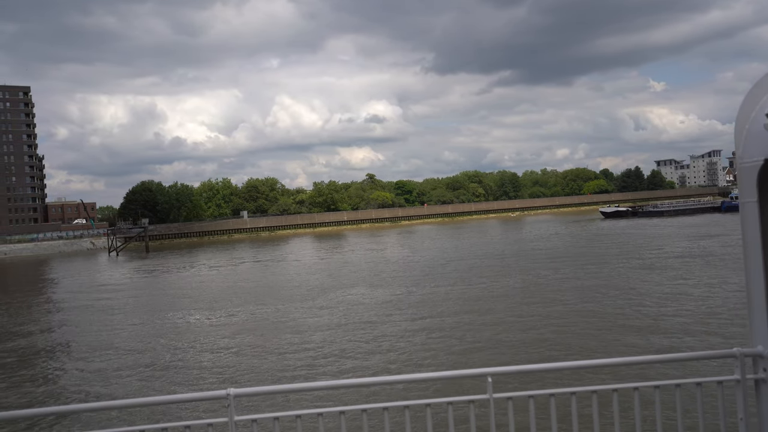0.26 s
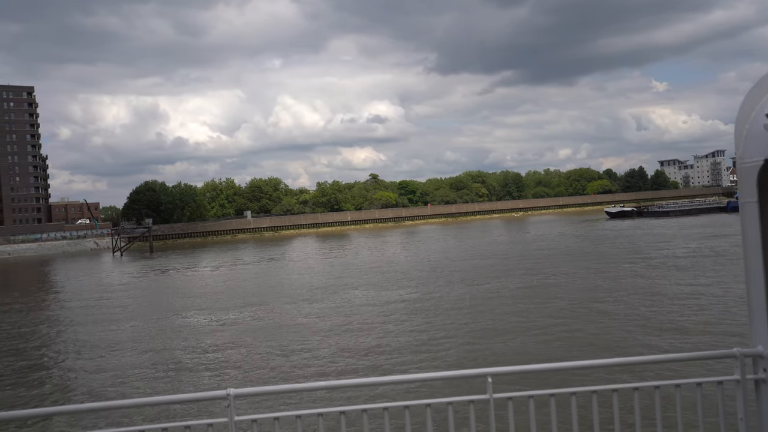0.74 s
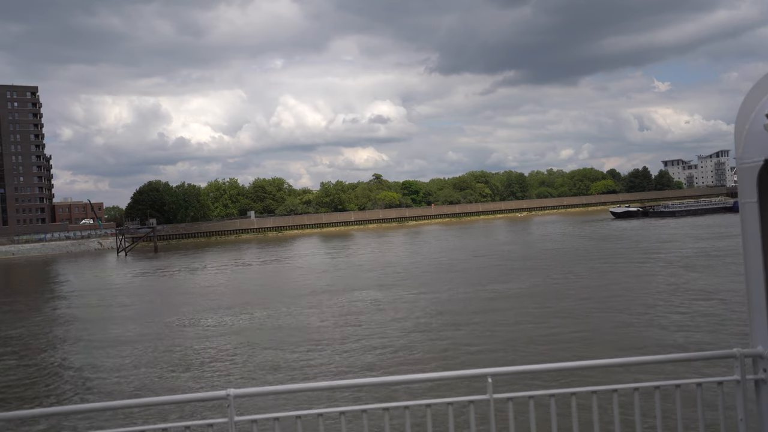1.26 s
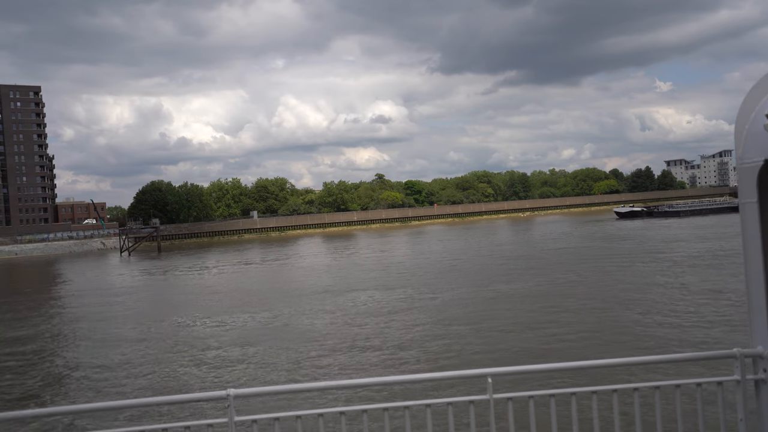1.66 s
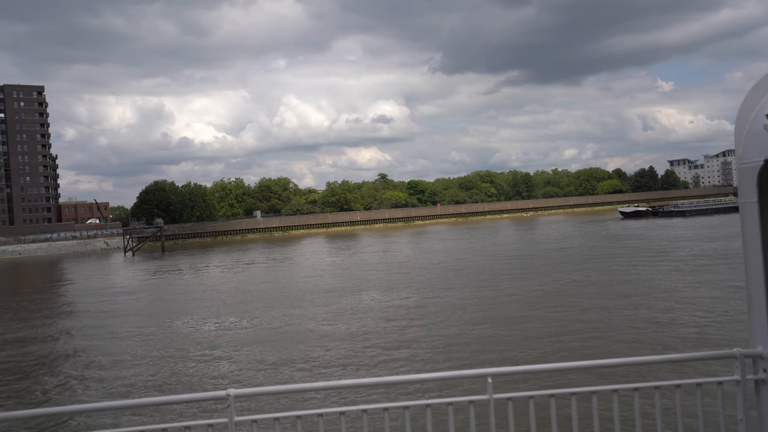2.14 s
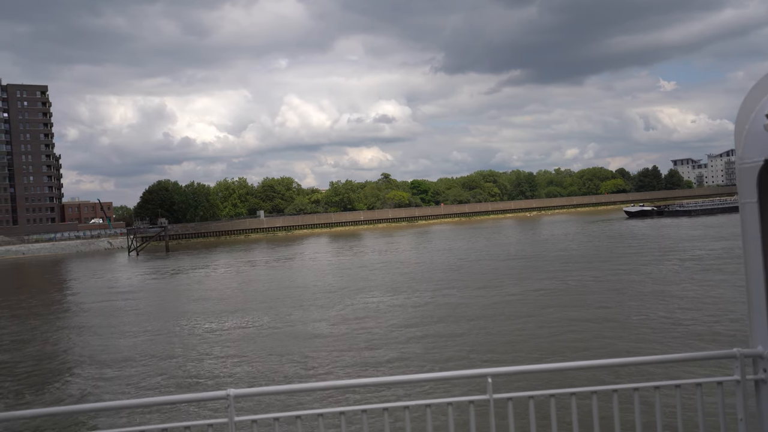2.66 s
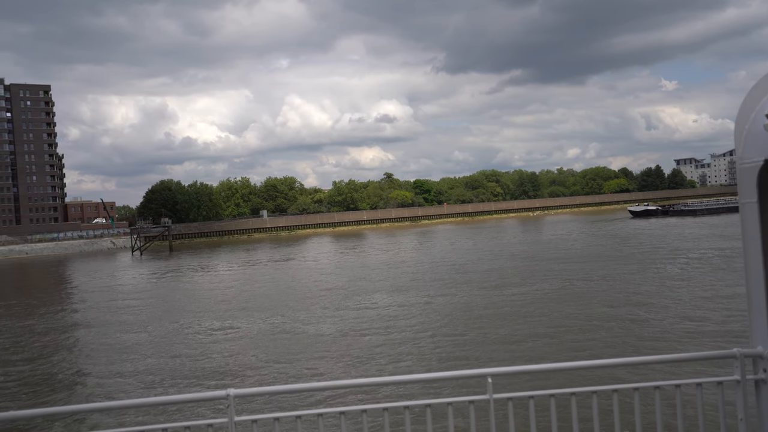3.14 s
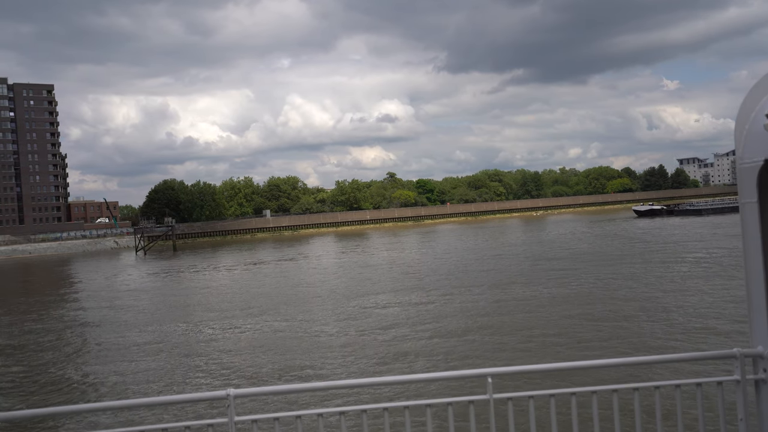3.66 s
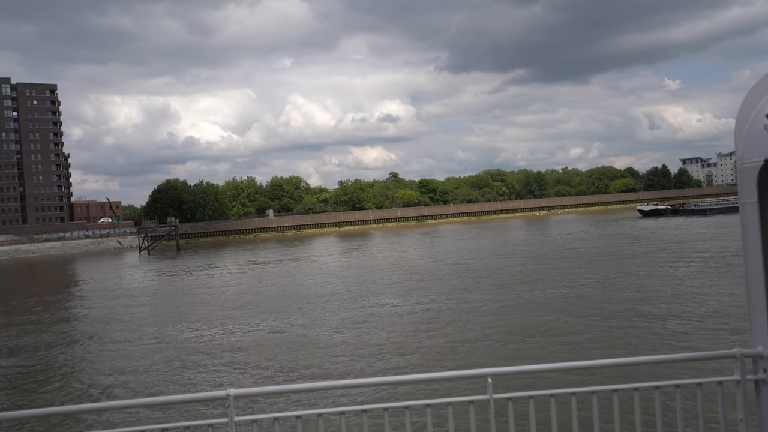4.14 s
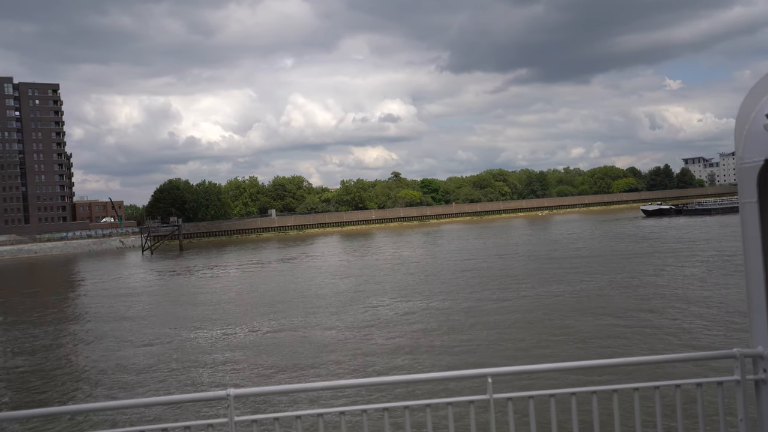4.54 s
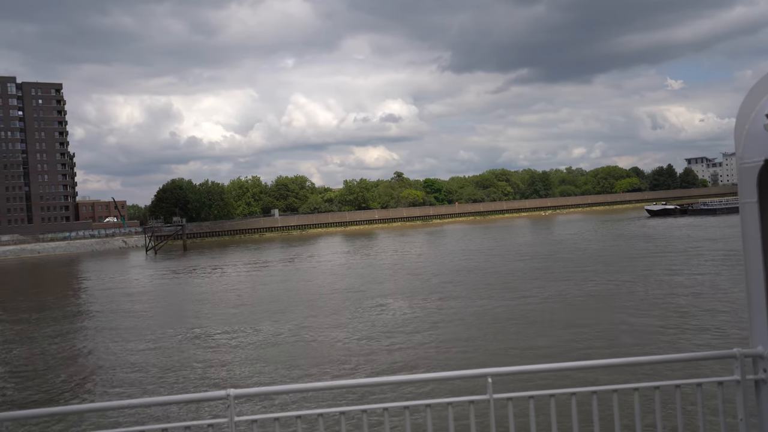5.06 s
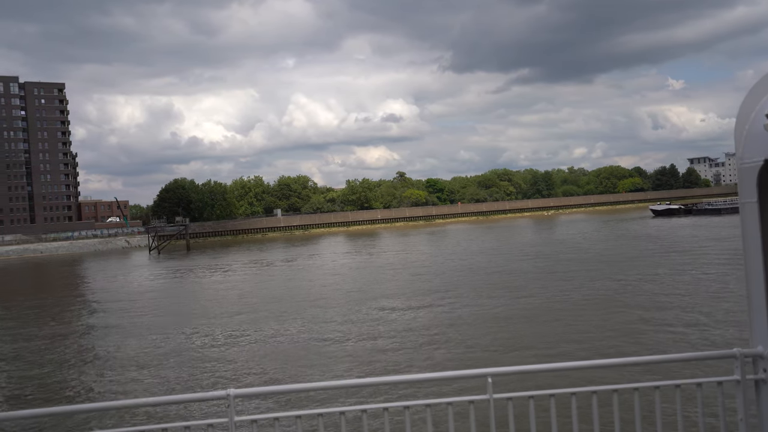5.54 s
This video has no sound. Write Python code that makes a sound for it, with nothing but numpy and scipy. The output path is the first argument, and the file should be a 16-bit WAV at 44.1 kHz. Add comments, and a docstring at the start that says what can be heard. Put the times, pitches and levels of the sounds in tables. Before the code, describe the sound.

A ferry's diesel engine rumbles steadily on an open deck, with faint hum, a few light shoe knocks and clothing rustle.

```python
"""A 900 rpm diesel drones through the shuddering hull of a river ferry, heard on the open deck.
Its clatter roars and rings the steel plating; auxiliary machines hum and whistle.
Air buffets the microphone over the wash of the river. Close by, shoes scuff and knock,
jacket fibres rustle as they catch and slip, and late on the deck plate thuds underfoot."""
import sys
import numpy as np
from scipy import signal
from scipy.fft import rfft, irfft
from scipy.io import wavfile
from scipy.ndimage import uniform_filter1d

SR = 44100
rng = np.random.default_rng(int(sys.argv[2]) if len(sys.argv) > 2 else 0)


def to_wav(sig):
    """Store sig (one row per channel, or 1-D mono) as 16-bit WAV at the path in sys.argv[1].

    Samples outside -1..1 are clipped; the rate is SR.
    """
    pcm = np.clip(np.atleast_2d(sig), -1, 1) * 32767
    pcm = np.round(pcm).astype(np.int16)
    wavfile.write(sys.argv[1], SR, pcm.T)  # frames by channels


N = 255780
TIME_S = np.arange(N) / SR
FREQ_HZ = np.maximum(np.fft.rfftfreq(N, 1 / SR), 1)

CYCLE_HZ, BOOM_ORDER = 7.5, 9  # four-stroke cycle: two revolutions
ROAR_DB, WASH_DB = -53, -78.5
EDDY_DB, EDDY_HZ = 1, 3.1
CONTACT_RISE_S, STROKE_RELEASE_S = 0.0006, 0.057
LOWPASS_HZ = 15700

# Levels are relative; widths are half-widths at -6 dB.
# engine harmonics (multiple of cycle, level/dB)
FIRING_ORDERS = [(6, -52), (12, -48.5), (14, -54.5), (16, -72.5), (18, -67), (20, -68.5), (24, -65.5),
                 (34, -79), (36, -74.5), (40, -69.5), (41, -73), (46, -76), (51, -75.5), (52, -70),
                 (53, -72), (60, -75.5), (62, -72), (80, -83.5), (89, -79), (130, -82.5)]
# superstructure boom: builds, peaks, settles (t/s, level/dB)
BOOM_ENVELOPE = [(0, -50.5), (.9, -51.5), (1.35, -39.5), (2.6, -51), (4, -47.5), (4.4, -41.5), (4.9, -44.5),
                 (5.8, -42)]
# bending modes of the whole hull (f/Hz, level/dB)
BENDING_MODES = [(18.6, -28.5), (23.5, -39.5), (30, -39.5)]
# swell of the shudder (t/s, level/dB)
SHUDDER_ENVELOPE = [(0, 11), (.1, -2.5), (.33, -1.5), (.45, -6.5), (.75, -6.5), (1.15, -5), (1.5, -14),
                    (1.7, -3), (1.95, -6), (2.22, -0.5), (2.37, -10.5), (2.55, -1.5), (3.12, -3),
                    (3.3, -13), (3.55, -8), (3.8, 0), (4.25, -3.5), (5.8, -8.5)]
# machinery roar (f/Hz, level/dB)
ROAR_SPECTRUM = [(70, 0.5), (110, -0.5), (200, -9.5), (270, -10.5), (350, -14), (440, -13), (560, -13),
                 (1050, -23), (1900, -26.5), (2500, -33.5), (3300, -41), (6000, -59)]
# hum of pumps, gears and fans (f/Hz, level/dB)
HUM_LINES = [(310.2, -66.5), (498, -76.5), (583.6, -80), (591, -71.5), (755, -81), (823.8, -74.5),
             (983, -89.5), (1183, -83), (1218.5, -88), (1533, -86.5), (2180, -90.5), (3642, -96),
             (3843, -98)]
# thin machinery whistles (f/Hz, width/Hz, level/dB)
WHISTLE_BANDS = [(4410, 89, -96.5), (4800, 46, -99), (5670, 60, -95.5)]
# strongest hum, most prominent early (t/s, level/dB)
PUMP_ENVELOPE = [(0, -80), (.45, -57.5), (1.35, -62.5), (1.7, -69.5), (2.6, -65), (3.3, -64.5),
                 (3.9, -67.5), (5.8, -63.5)]
# deck and casing resonances (f/Hz, width/Hz, level/dB)
PLATING_MODES = [(55.4, 16.2, -47.5), (96.6, 4.1, -55.5), (131.6, 23, -70.5), (210, 14, -66),
                 (307.6, 5.8, -69), (327.3, 8.8, -72), (343.8, 4.6, -66.5), (384.3, 5, -70.5),
                 (395.4, 6.3, -65.5), (493, 22, -68), (670, 81, -83), (864, 66, -72.5), (1215.5, 35, -76.5),
                 (1305, 37, -80.5), (1507, 61, -76.5)]
# gain of machinery and plating at the rail (t/s, level/dB)
CASING_ENVELOPE = [(0, 0.5), (.7, 0), (1.3, 0.2), (1.7, 0.5), (2.3, 1.2), (2.6, 0.3), (3.1, 0.3),
                   (3.5, -0.5), (4.3, -2.1), (5.8, 1)]
# river wash (f/Hz, level/dB)
WASH_SPECTRUM = [(500, -10), (2000, 0), (4700, 0), (6500, -3), (9000, -13), (11500, -19), (13000, -25),
                 (16000, -30)]
# air on the microphone (f/Hz, level/dB)
BUFFET_SPECTRUM = [(14, -26), (22, 8), (28, 12.5), (35, 13), (43, -4), (58, -7), (100, -20), (160, -27),
                   (400, -54.5)]
# breeze: early puffs, lull, strongest gust late (t/s, level/dB)
GUST_ENVELOPE = [(0, -29), (.8, -55), (.87, -24.5), (.92, -29.5), (1.02, -45.5), (2.4, -36.5), (2.75, -36),
                 (3.3, -36.5), (4.3, -39.5), (4.48, -33), (4.8, -28.5), (5.18, -34), (5.31, -21),
                 (5.46, -35), (5.66, -25.5), (5.8, -43.5)]
# shoe contacts (t/s, body/dB, click/dB, snap/dB, tick/dB, t60/s)
SHOE_CONTACTS = [(1.152, -72, -85, -83, -80, .027), (1.206, -54, -58, -57.5, -84, 0.032),
                 (1.216, -53, -81.5, -71, -88, 0.097), (1.262, -56, -67, -72, -91, 0.044),
                 (1.534, -69, -83, -70, -77, 0.035), (3.339, -70, -79, -75, -90, 0.083),
                 (3.372, -65, -72, -79, -90, .08), (3.792, -63, -86, -86, -97, 0.11),
                 (4.21, -64, -73, -81, -93, .14), (4.306, -68, -74, -74, -93, .15),
                 (4.579, -54.5, -77, -72, -80, 0.086), (4.729, -53, -62, -69, -81, 0.1),
                 (4.749, -54, -63, -81, -83, 0.11), (4.756, -51.5, -62, -66, -74, 0.055),
                 (4.8166, -46, -63, -62, -78, 0.18), (4.839, -52, -62, -68, -80, 0.039),
                 (4.846, -49, -76, -72, -83, 0.025), (5.2275, -48, -51.5, -51.5, -58.5, 0.11),
                 (5.25, -40.5, -68, -74, -72, 0.027), (5.257, -47.5, -67, -70, -78, 0.068),
                 (5.285, -69, -70, -65, -83, 0.055), (5.5582, -50, -83, -84, -93, 0.054)]
# dull body of the sole (f/Hz, width/Hz, level/dB)
BODY_MODES = [(490, 75, -5), (750, 58, 3), (850, 210, -5.5), (1262, 180, -2), (1880, 290, -6.5)]
# short rings of shoe and deck fittings (f/Hz, width/Hz, level/dB)
CLICK_MODES = [(2660, 340, 2.5), (3270, 190, 1.5), (3660, 180, -1)]
# hard heel snap (f/Hz, width/Hz, level/dB)
SNAP_MODES = [(4350, 290, -1), (4830, 420, 0.5), (5220, 180, 2.5), (5580, 240, -1), (6500, 330, 1.5),
              (7060, 260, 4)]
# highest rings of a hard contact (f/Hz, width/Hz, level/dB)
TICK_MODES = [(8500, 2000, -1.5), (10300, 260, -8), (11000, 250, 1), (12500, 600, -6.5)]
# cloth friction (f/Hz, level/dB)
CLOTH_SPECTRUM = [(300, -32.5), (1000, 6.5), (2000, 2), (3500, -1.5), (5000, -1.5), (7200, -1.5),
                  (9000, -4.5), (11000, -11), (13000, -15.5), (15500, -23)]
# jacket slides (t/s, rise/s, length/s, level/dB, treble/dB, decay/(dB/s))
CLOTH_STROKES = [(3.31, 0.13, 0.33, -69.5, -0.5, 13), (3.7, 0.22, 0.27, -77, -6, 4),
                 (4.035, 0.065, 0.11, -69, -12, 5), (4.298, 0.0054, 0.15, -68, -5.5, 23),
                 (4.511, 0.057, 0.14, -64.5, -1, 27), (4.709, .04, .14, -64.5, -9, -1),
                 (4.884, 0.037, 0.17, -72.5, 4, 7), (5.112, .03, 0.15, -79, -2, -7),
                 (5.23, 0.045, 0.058, -67.5, -1, 4), (5.36, 0.047, 0.26, -84, 3, 0),
                 (5.686, 0.09, .15, -62, -0.5, -3)]
# weight landing on the deck (t/s, level/dB)
FOOTFALLS = [(4.812, -55), (5.237, -57), (5.251, -37.5), (5.28, -43.5)]
# deck plate modes (f/Hz, level/dB, t60/s)
DECK_MODES = [(108, -16, 0.33), (150.4, 1.5, 0.24), (179.4, 1.5, .2), (209, 0, 0.13), (266, -11.5, 0.15),
              (459, -1, 0.073), (620, -8.5, 0.072)]


def undb(db):
    """Decibels to gain."""
    return 10 ** (np.asarray(db) / 20)


def unit(x):
    """Scale to rms 1."""
    return x / np.sqrt(np.mean(x ** 2))


def curve_db(table):
    """Linear interpolation of (t/s, level/dB) points."""
    return np.interp(TIME_S, *np.transpose(table))


def noise():
    """White noise."""
    return rng.standard_normal(N)


def colour(x, spectrum):
    """Filter by (f/Hz, level/dB) points, rolling off above the last; rms 1."""
    hz, db = np.transpose(spectrum)
    skirt = np.minimum(hz[-1] / FREQ_HZ, 1) ** 3
    gain = undb(np.interp(np.log(FREQ_HZ), np.log(hz), db))
    return unit(irfft(rfft(x) * skirt * gain, N))


def resonate(x, hz, width_hz):
    """One resonance applied twice for steep skirts; rms 1."""
    detuning = (FREQ_HZ / hz - hz / FREQ_HZ) * hz / (2 * width_hz)
    return unit(irfft(rfft(x) / (1 + 1j * detuning) ** 2, N))


def drift(rate_hz):
    """Random fluctuation up to about rate_hz; rms 1."""
    return unit(irfft(rfft(noise()) * np.exp(-(FREQ_HZ / rate_hz) ** 2), N))


def flatten(x, window_s):
    """Level out swells slower than the window; rms 1."""
    power = uniform_filter1d(x ** 2, int(window_s * SR))
    return unit(x / np.sqrt(power + 1e-9))


def tone(cycles, waver, rate_hz):
    """A line wavering in level and phase on its way through hull and moving air; rms 1."""
    carrier = np.exp(2j * np.pi * (cycles + rng.random()))
    path = 1 + waver * (drift(rate_hz) + 1j * drift(rate_hz))
    return unit((carrier * path).real)


def engine(cycles):
    """Firing drones at multiples of the cycle; one booms in the superstructure."""
    drone = sum(undb(db) * tone(order * cycles, waver=0.31, rate_hz=4) for order, db in FIRING_ORDERS)
    boom = tone(BOOM_ORDER * cycles, waver=0.49, rate_hz=5.5)
    return drone + undb(curve_db(BOOM_ENVELOPE)) * boom


def shudder():
    """The whole hull bends in low modes that beat and surge."""
    bending = sum(undb(db) * tone(hz * TIME_S, waver=0.34, rate_hz=1) for hz, db in BENDING_MODES)
    return undb(curve_db(SHUDDER_ENVELOPE)) * bending


def clatter(cycles, repeat_share):
    """Valves and injectors: part of the power repeats each cycle, the rest is random."""
    pattern = rng.standard_normal(int(SR / CYCLE_HZ))
    repeating = pattern[(cycles % 1 * len(pattern)).astype(int)]
    return np.sqrt(repeat_share) * repeating + np.sqrt(1 - repeat_share) * noise()


def roar(cycles):
    """Broadband machinery clatter, swelling slightly."""
    return undb(ROAR_DB + drift(16)) * colour(clatter(cycles, repeat_share=0.28), ROAR_SPECTRUM)


def machinery(pump_hz=362.4):
    """Auxiliary machines hum at their own speeds and whistle faintly."""
    hum = sum(undb(db) * tone(hz * TIME_S, waver=0.48, rate_hz=2.7) for hz, db in HUM_LINES)
    whistles = ringing(WHISTLE_BANDS)
    pump = undb(curve_db(PUMP_ENVELOPE)) * tone(pump_hz * TIME_S, waver=0.23, rate_hz=7.5)
    return hum + whistles + pump


def ringing(modes):
    """Resonances, each driven by its own noise."""
    return sum(undb(db) * resonate(noise(), hz, width_hz) for hz, width_hz, db in modes)


def plating(cycles):
    """The engine shakes the plating; each resonance swells independently."""
    return sum(undb(db + 1.2 * drift(11)) * resonate(clatter(cycles, repeat_share=0.15), hz, width_hz)
               for hz, width_hz, db in PLATING_MODES)


def river():
    """Wash along the hull; deck and casing reflections ripple its spectrum."""
    hiss = noise()
    lags = rng.integers(SR // 500, SR // 40, size=8)  # 2-25 ms
    echoes = sum(np.roll(hiss, lag) for lag in lags)
    return undb(WASH_DB + 0.5 * drift(4.5)) * colour(hiss + 0.13 * echoes, WASH_SPECTRUM)


def wind():
    """The breeze buffets the microphone in uneven eddies."""
    gust_db = curve_db(GUST_ENVELOPE) + EDDY_DB * drift(EDDY_HZ)
    return undb(gust_db) * flatten(colour(noise(), BUFFET_SPECTRUM), window_s=0.088)


def impact(start_s, t60_s, rise_s):
    """Contact envelope: quick rise, exponential fall."""
    age_s = np.maximum(TIME_S - start_s, 0)
    return (1 - np.exp(-age_s / rise_s)) * np.exp(-np.log(1000) * age_s / t60_s)


def shoes():
    """Each contact drives a dull body and a gritty click, snap and tick in its own proportions."""
    body, click, snap, tick = (flatten(unit(ringing(modes)), window_s=0.007)
                               for modes in (BODY_MODES, CLICK_MODES, SNAP_MODES, TICK_MODES))
    grit = unit(undb(drift(500)))
    knocks = np.zeros(N)
    for start_s, body_db, click_db, snap_db, tick_db, t60_s in SHOE_CONTACTS:
        rings = undb(click_db) * click + undb(snap_db) * snap + undb(tick_db) * tick
        knocks += impact(start_s, t60_s, CONTACT_RISE_S) * (undb(body_db) * body + grit * rings)
    return knocks


def stroke(start_s, rise_s, length_s, decay_db_per_s):
    """Slide envelope: ramps up, fades (grows if decay is negative), then comes to rest."""
    age_s = np.maximum(TIME_S - start_s, 0)
    release = np.exp(-np.maximum(age_s - length_s, 0) / STROKE_RELEASE_S)
    return np.minimum(age_s / rise_s, 1) * undb(-decay_db_per_s * age_s) * release


def jacket(shelf_hz=7040):
    """Fibres catch and slip in dense grains; each stroke has its own brightness."""
    grains = noise() * undb(2 * drift(900) + drift(70))
    slips = colour(grains, CLOTH_SPECTRUM)
    treble = irfft(rfft(slips) / (1 + (shelf_hz / FREQ_HZ) ** 4), N)
    rustle = np.zeros(N)
    for start_s, rise_s, length_s, db, treble_db, decay_db_per_s in CLOTH_STROKES:
        friction = slips + (undb(treble_db) - 1) * treble
        rustle += undb(db) * stroke(start_s, rise_s, length_s, decay_db_per_s) * friction
    return rustle


def deck():
    """Landing weight rings the deck plate, slightly detuned each time."""
    thuds = np.zeros(N)
    for start_s, db in FOOTFALLS:
        for hz, mode_db, t60_s in DECK_MODES:
            detuned_hz = hz * (1 + 0.029 * rng.standard_normal())
            ring = np.sin(2 * np.pi * detuned_hz * (TIME_S - start_s))
            thuds += undb(db + mode_db) * impact(start_s, t60_s, rise_s=0.0062) * ring
    return thuds


def scene():
    """Mono sum at the rail; the governor holds engine speed nearly steady."""
    cycles = np.cumsum(CYCLE_HZ * (1 + 0.0007 * drift(1))) / SR
    ferry = engine(cycles) + shudder() + roar(cycles)
    casing = undb(curve_db(CASING_ENVELOPE)) * (machinery() + plating(cycles))
    return (ferry + casing + river() + wind() + shoes() + jacket() + deck())[None]


def record(dry):
    """Steep elliptic low-pass."""
    return signal.sosfilt(signal.ellip(8, 0.2, 70, LOWPASS_HZ, fs=SR, output="sos"), dry)


dry = scene()
out = record(dry)
to_wav(out)
```